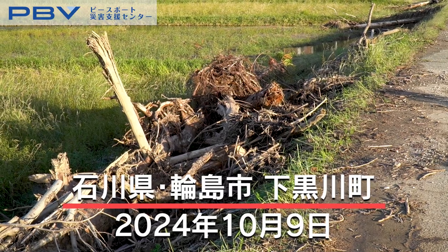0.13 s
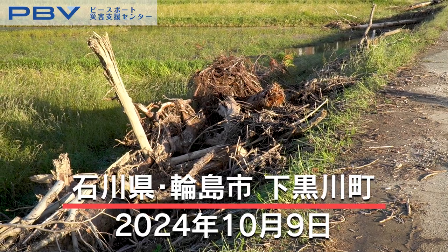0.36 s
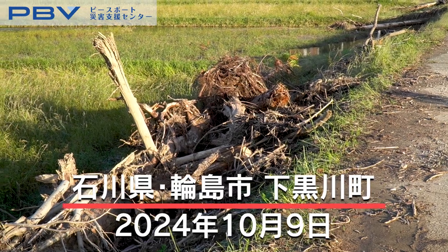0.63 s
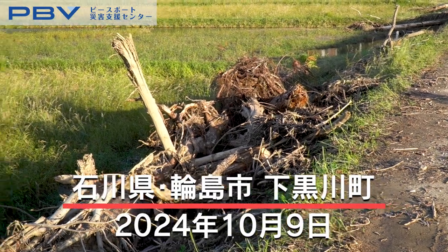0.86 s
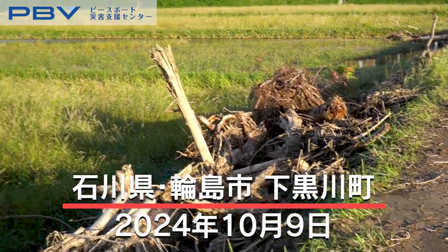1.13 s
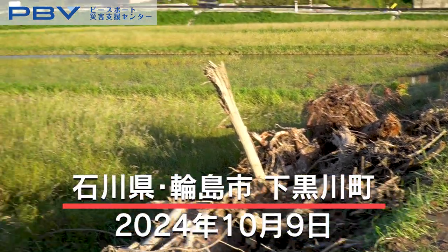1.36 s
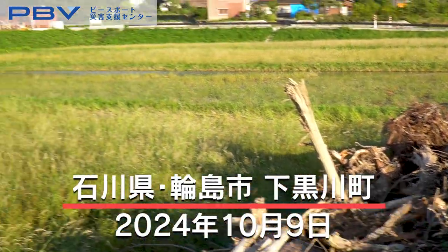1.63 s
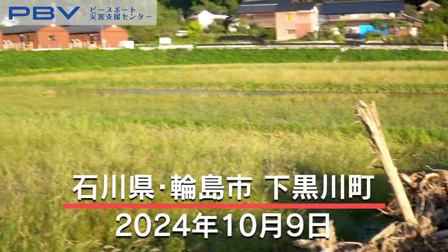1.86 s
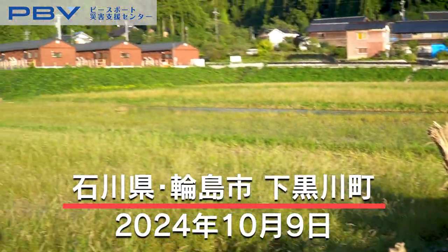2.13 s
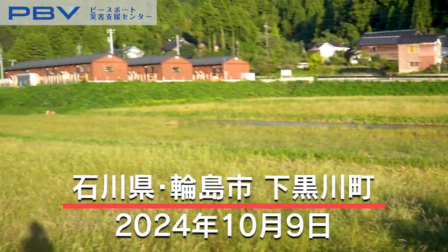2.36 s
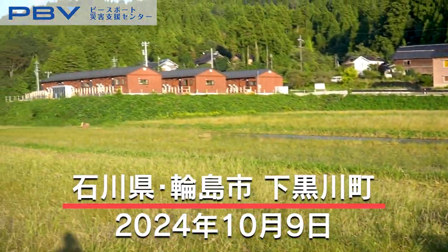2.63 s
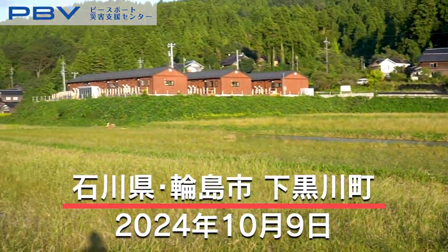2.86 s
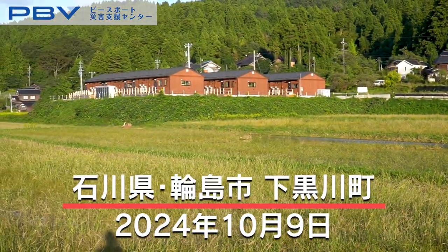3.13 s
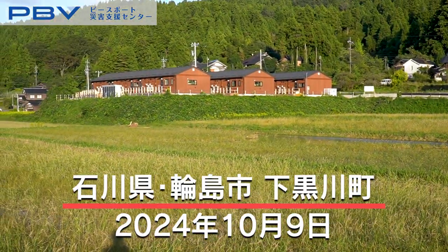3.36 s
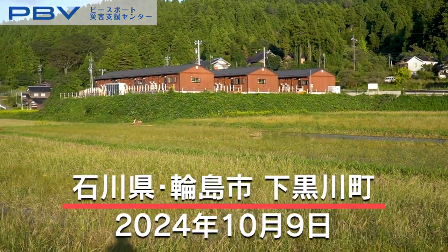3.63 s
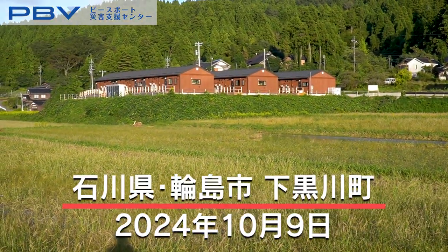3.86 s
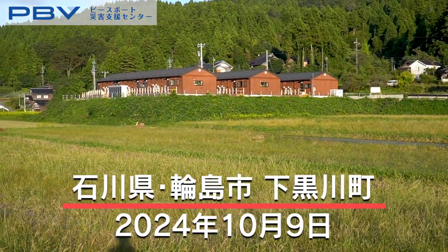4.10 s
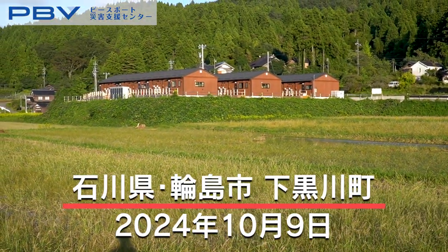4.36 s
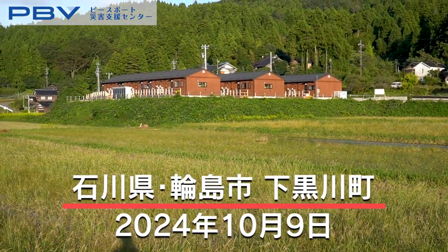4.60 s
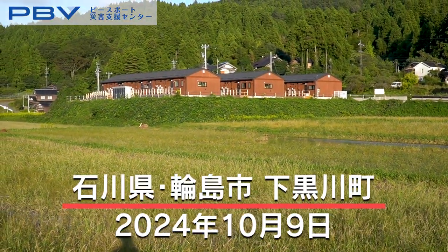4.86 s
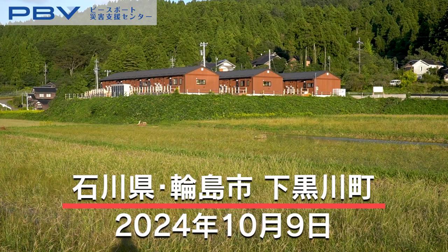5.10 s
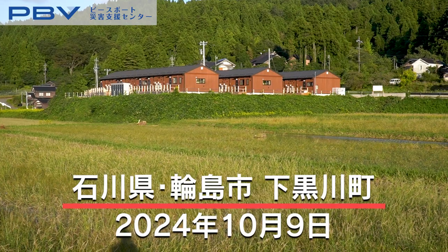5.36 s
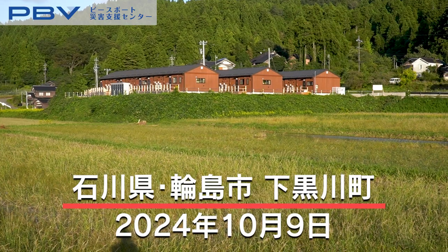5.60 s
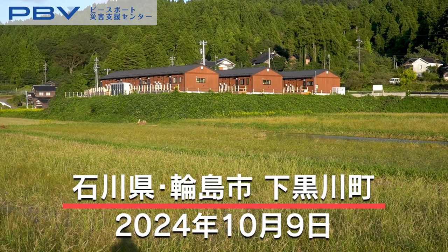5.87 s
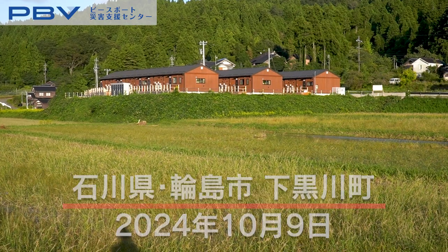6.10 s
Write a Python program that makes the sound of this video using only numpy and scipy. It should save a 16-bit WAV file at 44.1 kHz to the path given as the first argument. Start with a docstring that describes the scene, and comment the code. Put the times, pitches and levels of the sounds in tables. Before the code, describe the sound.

Steady high insect trills and fast cricket chirp runs over quiet far rumble; distant crow caws join midway, and wind buffets low near the end.

```python
"""Rice fields on a breezy evening. From the start, wing-stroke trills of several ground crickets lie over
noise-made hush of far water, traffic and blurred insect chorus, whispering grass and low wind noise.
From 0.2 s a field cricket chirps in runs of falling tones; a deeper one answers from 0.5 s. Short piping
notes come at 2.7 s and after 5.5 s. From 3 s a far crow croaks four times, in pulses of rough voice with
two throat resonances. The wind noise on the microphone flutters and is strongest near the end."""
import sys
import numpy as np
from scipy import signal
from scipy.io import wavfile
from scipy.ndimage import uniform_filter1d

SR = 44100
rng = np.random.default_rng(int(sys.argv[2]) if len(sys.argv) > 2 else 0)


def store_pcm(level_fs):
    """Save levels as 16-bit WAV."""
    pcm = np.round(np.clip(level_fs, -1, 1) * 32767).astype(np.int16)
    wavfile.write(sys.argv[1], SR, np.atleast_2d(pcm).T)


def invert_db(x):
    """Field ratio 10**(x/20) for x, a level in decibels (scalar or array-like)."""
    u = np.asarray(x, float) / 20
    return 10 ** u


N = 274743

# Noise spectra, relative: (frequency [Hz], density [dB])
HUSH_SPECTRUM = [(71, -20), (120, -3), (188, -2.5), (255, -0.77), (367, -4), (1170, -7), (2030, -14.5),
                 (3300, -21), (4760, -27), (5720, -21), (7000, -34), (10000, -43.5)]
RUMBLE_SPECTRUM = [(20, -23), (40, 1), (70, -1.5), (110, -6), (170, -18.5), (260, -34)]
WIND_SPECTRUM = [(2, -18), (6, 3.5), (14, 5.5), (30, -11.5), (60, -24), (120, -40)]
GRASS_SPECTRUM = [(300, -11.5), (1000, -9.5), (2200, -2.5), (3500, -14.0), (7000, -30.0)]
HISS_SPECTRUM = [(2000, -6.5), (5000, 2), (8000, -5), (11200, -5.5), (15500, -9.5)]
HISS_DB = -70.5

# Far hush: (time [s], level [dB])
HUSH_LEVEL = [(0.0, -51.5), (0.42, -52), (3.05, -48.5), (4.91, -48.5), (6.23, -47)]
# Far traffic, before it follows the wind level: (time [s], level [dB])
RUMBLE_LEVEL = [(0.0, -53.5), (1.07, -54), (3.45, -48), (3.49, -53), (4.42, -51.5), (4.75, -57),
                (6.23, -44)]
RUMBLE_FOLLOW_DB_PER_DB = 0.13  # of wind level
# Rough level of the low wind noise, partly chance flutter, strongest near the end: (time [s], level [dB])
WIND_LEVEL = [(0.0, -47), (0.05, -40.5), (0.97, -47.5), (2.88, -37), (2.98, -52), (3.09, -41.5),
              (4.51, -40), (4.77, -46), (5.36, -32.5), (5.45, -50), (5.5, -31.5), (5.69, -23), (5.83, -38),
              (5.86, -31.5), (6.2, -25), (6.23, -38)]
# Grass stirs: (middle [s], half length [s], peak [dB])
GRASS_STIRS = [(1.472, 0.11, -57), (3.22, .08, -60)]
GRASS_RE_HUSH_DB = -13  # steady whisper

# Croaks, before shape and gape: (start [s], level at strongest [dB], pulse rate [1/s], throat [Hz],
# upper resonance [Hz])
CROAKS = [(3.063, -50.5, 50.5, 1340, 2350), (4.02, -49.5, 49, 1235, 1730), (4.94, -49.5, 45, 1215, 1740),
          (5.81, -53.5, 45, 1185, 1850)]
# Strong and weak half of a croak: (share of length [1], level [dB],
# upper resonance re throat before gape [dB], pitch factor [1])
CROAK_SHAPE = [(0, -11, -10, .96), (.14, -2, -11, .995), (.43, 0, -9, 1.0), (.53, -8.5, -5, 1.03),
               (.72, -7, -6, 1.04), (1, -13, -6, 1.02)]
CROAK_S = .31
GAPE_RATIO, GAPE_DB_PER_UNIT = 1.55, 16  # upper/throat ratio of no gain; gain per unit of ratio
# Far birds' piping notes: (start [s], peak [dB], pitch [Hz], length [s])
PIPES = [(2.695, -65, 3850, 0.07), (5.575, -49, 770, 0.045), (5.585, -52, 1205, 0.035),
         (6.095, -57.5, 2470, 0.035)]

# Steady trills, one row a stretch: main trill, low trill early and later, a faint one, a faint high
# overtone: (wing strokes [1/s], pitch at first effort [Hz], effort as (time [s], level [dB]))
STEADY_TRILLS = [ (94.6, 5800, [(0, -63.5), (1.7, -63.5), (2.1, -66), (2.3, -72), (2.32, -99), (2.69, -99),
                 (2.7, -67), (3.9, -61), (5.245, -61.5)]), (91.5, 5380, [(0, -64), (1.26, -64)]),
                 (88, 5350, [(2.75, -71), (3.2, -69), (6.23, -68.5)]), (100, 5680, [(5.25, -71), (5.6, -69),
                 (5.85, -71)]), (98, 11200, [(0, -88), (.5, -81.5), (1.1, -83), (2.3, -91)]), ]
STEADY_HZ_PER_DB = 22
# Near triller, one row a phrase: (start [s], end [s], first level [dB], full level [dB],
# pitch at full level [Hz])
NEAR_PHRASES = [(0, 0.232, -64, -62.5, 5760), (1.201, 1.51, -63.5, -60.5, 5760),
                (2.13, 2.699, -63.5, -55.5, 5750), (3.33, 3.883, -61, -53.5, 5840),
                (4.5, 5.073, -63, -53, 5800), (5.78, 6.332, -63.5, -52.5, 5820)]
# Slowing of the near triller: (time before phrase end [s], wing strokes [1/s])
NEAR_SLOWING = [(0, 113), (.1, 117.3), (.3, 125.2), (.6, 132.5)]
SWELL_SHARE, NEAR_HZ_PER_DB = .7, 8  # share of phrase to full level; pitch follows effort

# Deeper cricket, one row a chirp: (start [s], peak [dB], pitch [Hz])
DEEP_CHIRPS = [(.515, -65, 3740), (.62, -66, 3724), (.708, -64, 3724), (.805, -62, 3750), (.896, -57, 3730),
               (.982, -56.5, 3760), (1.07, -57.5, 3750), (1.16, -60, 3770), (1.26, -64, 3770),
               (1.585, -64, 3780), (1.7, -64, 3736), (3.125, -67, 3500), (3.208, -64, 3500),
               (3.292, -59, 3550), (3.428, -62, 3530), (3.54, -65, 3500), (3.66, -64, 3520),
               (3.8, -64, 3550), (3.87, -65, 3450), (5.475, -58.5, 3570)]
# Field cricket, one row a run: (first chirp [s], last chirp [s])
CHIRP_RUNS = [(.2164, .4164), (.6335, 1.3784), (1.4601, 1.9061), (3.1607, 3.993), (5.9334, 6.2028)]
# Field cricket effort, before random unevenness: (time [s], peak [dB], pitch [Hz])
CHIRP_EFFORT = [(.2, -61.5, 4100), (.42, -65, 4210), (.63, -62, 4320), (.85, -58, 4360), (1.0, -52.5, 4390),
                (1.33, -50, 4430), (1.65, -51.5, 4445), (1.91, -63, 4460), (3.16, -61, 4370),
                (3.24, -58, 4335), (3.5, -55, 4410), (3.75, -55.5, 4460), (3.85, -52.5, 4460),
                (4.0, -52, 4430), (5.93, -57.5, 4330), (6.02, -51.5, 4340), (6.13, -52.5, 4400),
                (6.21, -53, 4410)]
CHIRP_GAP_S = .0397  # nominal; sets the number of chirps
CHIRP_LAG, CHIRP_UNEVEN_DB = .027, 1.2  # gaps lengthen by the lag; random level spread


def evened(x):
    """Scales to rms 1."""
    return x / np.sqrt(np.mean(x ** 2) + 1e-20)


def add(mix, start_s, sound):
    """Lays a sound into the mix."""
    part = mix[max(round(start_s * SR), 0):][:len(sound)]
    part += sound[:len(part)]


def unrolled(rows):
    """Joins table rows into one curve per column."""
    s, *columns = np.transpose(rows)
    t = np.arange(max(s[0], 0), s[-1], 1 / SR)
    return [np.interp(t, s, c) for c in columns]


def gain(rows):
    """Gain over the whole scene from (time [s], level [dB]) rows."""
    s, db = np.transpose(rows)
    return invert_db(np.interp(np.arange(N) / SR, s, db))


def noise(spectrum, size, patchy_db, flicker_db):
    """Random short-time spectra with drifting patches and a flicker shared by all bands, rms 1."""
    frames, hz = 4 * N // size + 5, np.fft.rfftfreq(size, 1 / SR)
    real, imag, patches = rng.standard_normal((frames, len(hz), 3)).T
    patches = uniform_filter1d(patches, size=14, axis=0)  # across frequency
    patches = evened(uniform_filter1d(patches, size=10, axis=1))  # across time
    flicker = evened(uniform_filter1d(rng.standard_normal(frames), size=3))
    f, db = np.transpose(spectrum)
    shape_db = np.interp(np.log(hz + 1), np.log(f + 1), db, right=-120)
    level_db = shape_db[:, None] + patchy_db * patches + flicker_db * flicker
    z = (real + 1j * imag) * invert_db(level_db)
    return evened(signal.istft(z, nperseg=size, noverlap=3 * size // 4)[1][:N])


def resonate(x, hz, width_hz):
    """Gliding resonance: shifts the curve hz down to zero, smooths twice, shifts back."""
    turn = np.exp(2j * np.pi * np.cumsum(hz * np.ones(len(x))) / SR)
    r = np.exp(-np.pi * width_hz / SR)
    smooth = signal.lfilter([(1 - r) ** 2], [1, -2 * r, r * r], x / turn)
    return 2 * (turn * smooth).real


def field_echo(x, t60_s):
    """Scattered echoes from grass and ground: sparse random taps, decaying 60 dB in t60_s."""
    t = np.arange(SR // 2) / SR
    hits = rng.random(len(t)) < 2000 / SR
    taps = rng.choice([-1., 1.], len(t)) * hits * invert_db(-60 * t / t60_s)
    return signal.fftconvolve(x, taps / np.linalg.norm(taps))[:N]


def microphone_hiss():
    """Steady noise of the microphone."""
    return invert_db(HISS_DB) * noise(HISS_SPECTRUM, size=256, patchy_db=0.6, flicker_db=0.45)


def far_hush():
    """Distant water, traffic and a blurred far insect chorus as slowly swelling noise."""
    return gain(HUSH_LEVEL) * noise(HUSH_SPECTRUM, size=1024, patchy_db=0.2, flicker_db=0.06)


def traffic_rumble():
    """Low noise of far traffic, rising slightly with the wind level."""
    follow = evened(gain(WIND_LEVEL) ** RUMBLE_FOLLOW_DB_PER_DB)
    rumble = noise(RUMBLE_SPECTRUM, size=4096, patchy_db=0.3, flicker_db=0.66)
    return gain(RUMBLE_LEVEL) * follow * rumble


def wind_buffet():
    """Wind on the microphone: fluttering noise, mostly below 30 Hz."""
    return gain(WIND_LEVEL) * noise(WIND_SPECTRUM, size=8192, patchy_db=0.6, flicker_db=0.36)


def grass_rustle():
    """Flickering noise: a whisper that follows the hush level, plus brief stirs."""
    t = np.arange(N) / SR
    level = invert_db(GRASS_RE_HUSH_DB) * gain(HUSH_LEVEL)
    for middle_s, half_s, db in GRASS_STIRS:
        level = level + invert_db(db) * np.exp(-((t - middle_s) / half_s) ** 2)
    return level * noise(GRASS_SPECTRUM, size=256, patchy_db=1.0, flicker_db=2.2)


def croak(db, rate, throat_hz, upper_hz, rise, breath):
    """Slow pulses of rough voice; both resonances slide up within each pulse; a wide beak lifts the upper."""
    level_db, upper_db, bend = unrolled([(share * CROAK_S, *rest) for share, *rest in CROAK_SHAPE])
    u = np.arange(len(bend)) * rate / SR % 1
    slide = 1 + rise * (u - .4)
    pulse = .12 + np.sin(np.pi * u) ** 2
    air = rng.standard_normal(len(u))
    gape_db = GAPE_DB_PER_UNIT * (upper_hz / throat_hz - GAPE_RATIO)
    voice = 0
    for hz, part_db, width_hz in ((throat_hz, 0, 200), (upper_hz, upper_db + gape_db, 350)):
        f = hz * bend * slide
        ring = np.sin(2 * np.pi * np.cumsum(f) / SR)
        rough = ring + breath * evened(resonate(air, f, width_hz))
        voice = voice + invert_db(part_db) * evened(pulse * rough)
    return invert_db(db + level_db) * voice


def falling_tone(db, hz, length_s, fall_hz, edge, octave_db):
    """A clean tone with its octave, falling ever faster; in crickets, one slow wing stroke."""
    u = np.linspace(0, 1, round(length_s * SR))
    turn = 2 * np.pi * np.cumsum(hz + fall_hz * (.33 - u ** 1.72)) / SR + 2 * np.pi * rng.random()
    tone = np.sin(turn) + invert_db(octave_db) * np.sin(2 * turn)
    return invert_db(db) * signal.windows.tukey(len(u), min(edge, 1)) * tone


def far_birds():
    """Crow croaks and short piping notes."""
    birds = np.zeros(N)
    for start_s, *voice in CROAKS:
        add(birds, start_s, croak(*voice, rise=.2, breath=.6))
    for s, db, hz, length_s in PIPES:
        add(birds, s, falling_tone(db, hz, length_s, fall_hz=30, edge=0.305, octave_db=-29.0))
    return birds


def trill(level_db, rate, hz, closing, fall_hz, uneven_db, octave_db):
    """Each closing wing stroke scrapes a short tone that falls in pitch; opening wings are silent."""
    strokes = np.cumsum(rate) / SR
    chance = rng.standard_normal((int(strokes[-1]) + 1, 3))[strokes.astype(int)]
    pitch_chance, level_chance, time_chance = chance.T
    u = np.clip((strokes % 1 - .1 - .02 * time_chance) / closing, 0, 1)  # share of closing stroke done
    turn = 2 * np.pi * np.cumsum(hz + fall_hz * (.5 - u) + 60 * pitch_chance) / SR
    tone = np.sin(turn) + invert_db(octave_db) * np.sin(2 * turn)
    scrape = invert_db(uneven_db * level_chance) * np.sin(np.pi * u) ** 0.99 * tone
    return invert_db(level_db) * evened(scrape)


def steady_trill(rate, hz, effort):
    """An even trill whose pitch follows effort."""
    level_db, = unrolled(effort)
    hz = hz + STEADY_HZ_PER_DB * np.maximum(level_db - effort[0][1], -5)
    return trill(level_db, np.full(len(hz), rate), hz, closing=.45, fall_hz=780, uneven_db=.7, octave_db=-31)


def near_trill(start_s, end_s, first_db, full_db, hz):
    """A phrase swells to a plateau and stops short; the wings tire and slow toward its end."""
    t = np.arange(start_s, end_s, 1 / SR)
    level_db = np.interp((t - start_s) / (end_s - start_s), [0, SWELL_SHARE], [first_db, full_db])
    rate = np.interp(end_s - t, *np.transpose(NEAR_SLOWING))
    hz = hz + NEAR_HZ_PER_DB * (level_db - full_db)
    return trill(level_db, rate, hz, closing=.72, fall_hz=680, uneven_db=.8, octave_db=-24)


def deep_chirp(db, hz):
    """One wing stroke of the deeper cricket."""
    return falling_tone(db, hz, length_s=.05, fall_hz=640, edge=0.7, octave_db=-27.5)


def field_chirp(db, hz):
    """One wing stroke of the field cricket; stronger strokes last longer and fall further."""
    length_s = 0.026 + 0.00059 * (db + 53)
    return falling_tone(db, hz, length_s, fall_hz=218.5 + 12 * (db + 48), edge=0.62, octave_db=-32)


def chirp_run(first_s, last_s):
    """Lists one run as (start [s], sound): nearly even spacing, slowing a little."""
    u = np.linspace(0, 1, round((last_s - first_s) / CHIRP_GAP_S) + 1)
    times = first_s + (last_s - first_s) * (u - CHIRP_LAG * u * (1 - u))
    at, effort_db, pitch_hz = np.transpose(CHIRP_EFFORT)
    levels = np.interp(times, at, effort_db) + CHIRP_UNEVEN_DB * rng.standard_normal(len(u))
    pitches = np.interp(times, at, pitch_hz)
    return [(s - .006, field_chirp(db, hz)) for s, db, hz in zip(times, levels, pitches)]


def crickets():
    """All trills and both chirping crickets."""
    insects = np.zeros(N)
    for rate, hz, effort in STEADY_TRILLS:
        add(insects, effort[0][0], steady_trill(rate, hz, effort))
    for phrase in NEAR_PHRASES:
        add(insects, phrase[0], near_trill(*phrase))
    for s, db, hz in DEEP_CHIRPS:
        add(insects, s, deep_chirp(db, hz))
    for run in CHIRP_RUNS:
        for s, sound in chirp_run(*run):
            add(insects, s, sound)
    return insects


def scene():
    """Hush, rumble, wind and grass behind the animals and their echoes."""
    background = far_hush() + traffic_rumble() + wind_buffet() + grass_rustle()
    birds, insects = far_birds(), crickets()
    echoes = invert_db(-8) * field_echo(birds, t60_s=.35) + invert_db(-12) * field_echo(insects, t60_s=.07)
    return (background + birds + insects + echoes)[None]


def roll_off(x):
    """The treble ends steeply here."""
    return signal.sosfilt(signal.butter(12, 15630, fs=SR, output="sos"), x)


def record(dry):
    """The microphone adds its steady hiss."""
    mix = dry + microphone_hiss()
    return roll_off(mix)


dry = scene()
out = record(dry)
store_pcm(out)
```